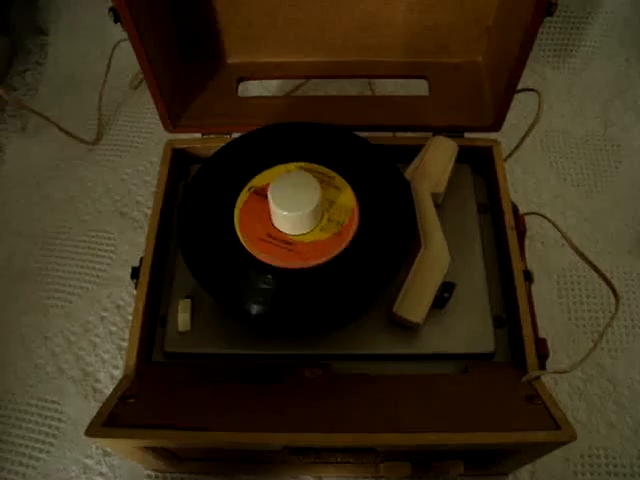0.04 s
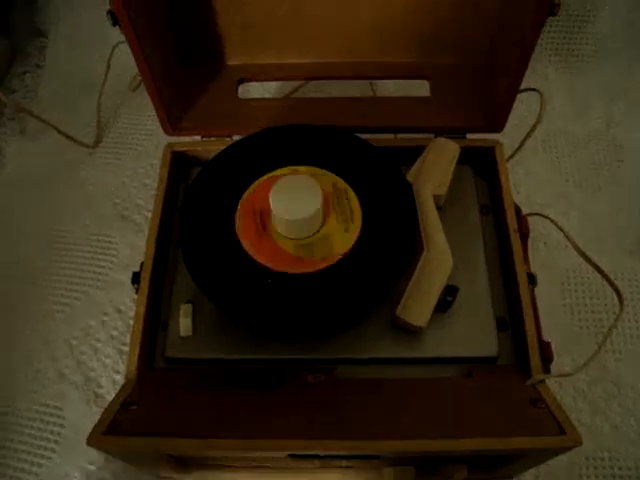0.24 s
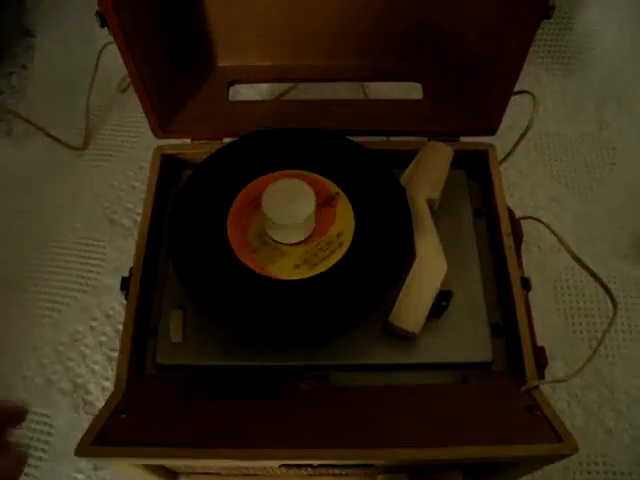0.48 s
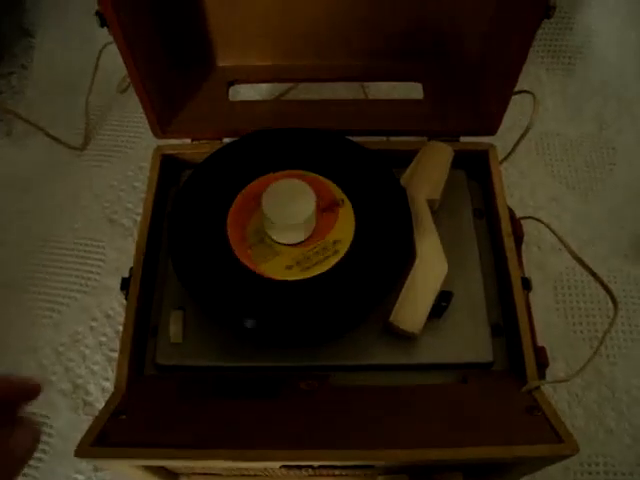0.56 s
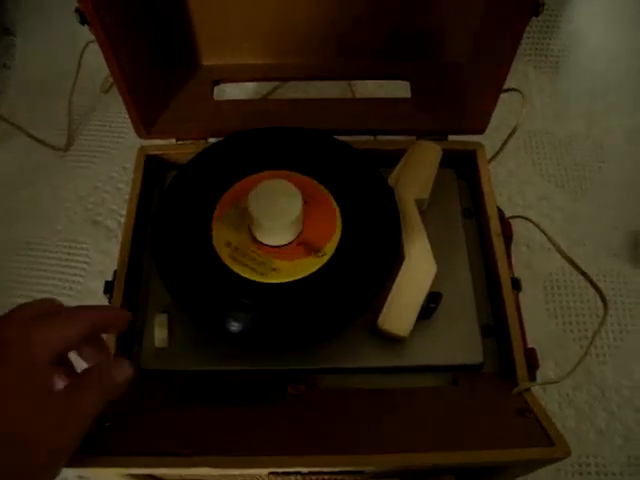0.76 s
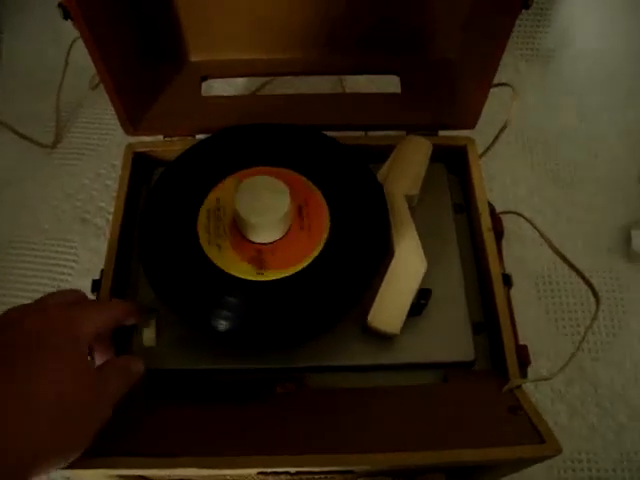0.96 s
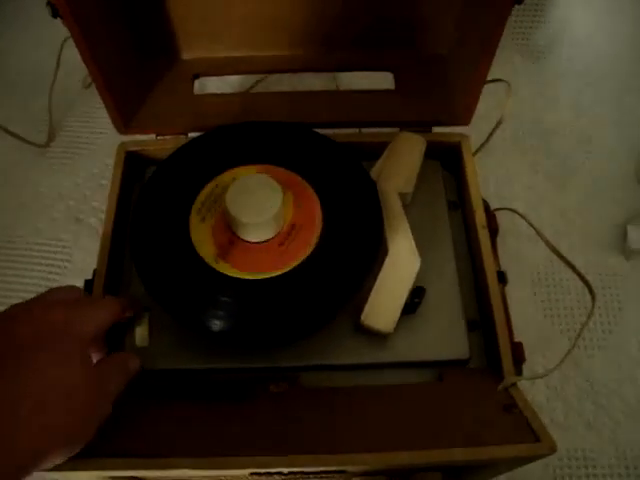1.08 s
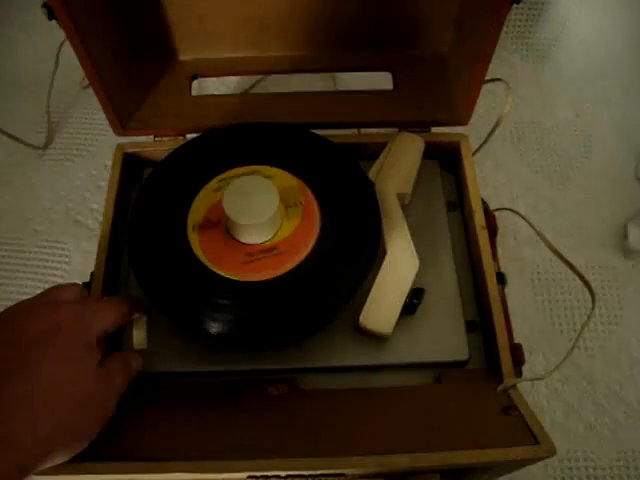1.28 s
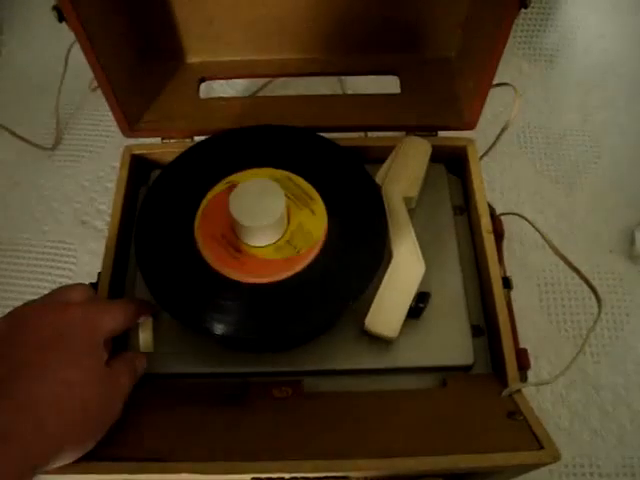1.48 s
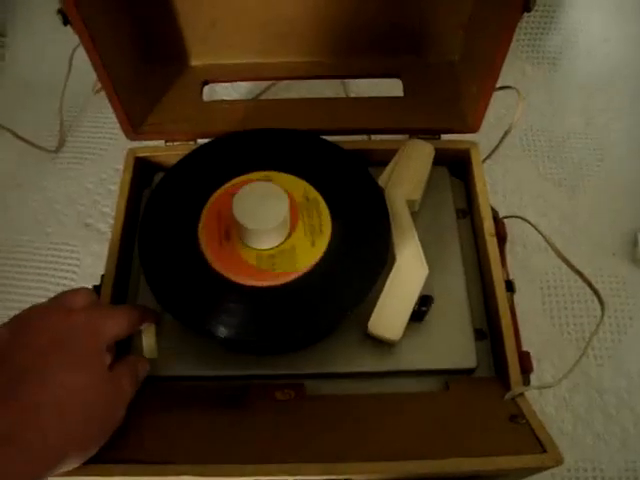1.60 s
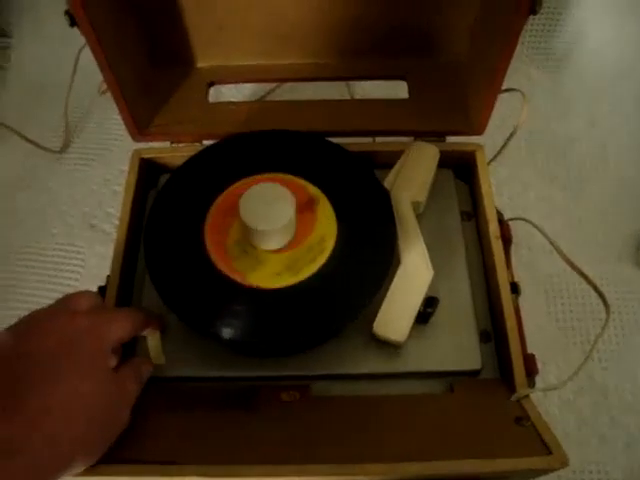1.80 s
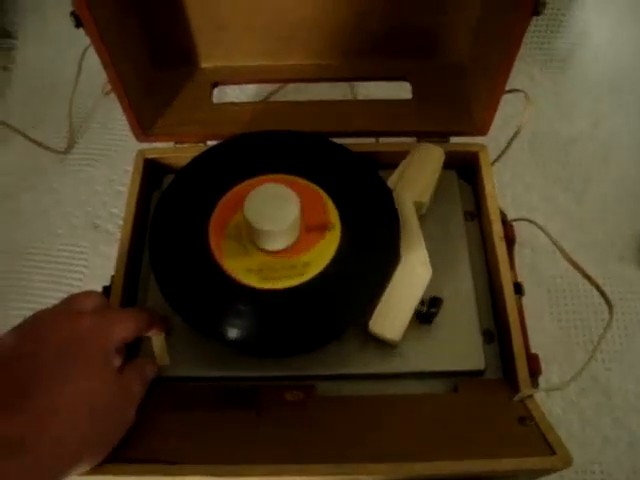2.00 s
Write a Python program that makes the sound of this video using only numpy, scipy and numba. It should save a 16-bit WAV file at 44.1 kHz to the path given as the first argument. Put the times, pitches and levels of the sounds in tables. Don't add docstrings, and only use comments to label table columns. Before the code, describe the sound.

A portable turntable runs with a low wavering motor hum and soft wooden thumps about eleven times a second. Near silence until 0.14 s, then a snappy plastic button click. Fingers rub and click the camera shell at 0.42-0.55 s, with slight clicks near 0.74, 1.21 and 1.92 s. Short dry rattles recur from 0.7 s, over thin room hiss and faint high whistle, until the end.

```python
import sys
import numpy as np
from scipy import signal
from scipy.io import wavfile
from scipy.ndimage import uniform_filter1d
from numba import njit

SR = 44100
rng = np.random.default_rng(int(sys.argv[2]) if len(sys.argv) > 2 else 0)


def int16_out(signal):
    q = np.round(np.clip(np.atleast_2d(signal).T, -1, 1) * 32767)
    wavfile.write(sys.argv[1], SR, q.astype(np.int16))


def decibels_to_gain(level_db):
    exponent = np.asarray(level_db, float) / 20
    return 10 ** exponent


N = 90228
T = np.arange(N) / SR
START_S = 0.136
HIT_T = np.arange(3000) / SR


@njit
def svf(x, hz, width):
    y, band, low = np.empty(len(x)), 0., 0.
    g, k = np.tan(np.pi * hz / SR), width / hz
    for i in range(len(x)):
        v = (band + g * (x[i] - low)) / (1 + g * (g + k))
        band, low, y[i] = 2 * v - band, low + 2 * g * v, k * v
    return y


def unit(x):
    return x / np.sqrt(np.mean(x ** 2))


def walk(rate):
    k = int(SR / rate)
    held = np.repeat(rng.standard_normal(N // k + 1), k)
    return 1.25 * uniform_filter1d(uniform_filter1d(held, k), k)[:N]


def body(x, table, steep=False):
    out = 0
    for k, (hz, width, db) in enumerate(table):
        y = svf(x, 1. * hz, 2. * width) if steep else x
        out = out + (-1) ** k * decibels_to_gain(db) * svf(y, 1. * hz, 1. * width)
    return out


def ring(modes, t, chance):
    scatter_db, rise_s = 1.5, 0.0006
    y = 0
    for (hz, db, t60), c in zip(modes, chance):
        decay = np.exp(-np.log(1000) * t / t60)
        y = y + decibels_to_gain(db + scatter_db * c) * np.sin(2 * np.pi * hz * (1 + 0.006 * c) * t + 2 * c) * decay
    y = y * np.clip(t / rise_s, 0, 1)
    return y / np.abs(y).max()


def crack(hiss):
    return svf(svf(hiss, 5000., 3700.), 5000., 5500.) * np.exp(-HIT_T / 0.00082)


def tones(table, waver_db, rate, blur_hz=0):
    out = 0
    for hz, db in table:
        level = np.sqrt(2) * decibels_to_gain(db + waver_db * walk(rate))
        cycles = np.cumsum(hz + blur_hz * walk(rate)) / SR + rng.random()
        out = out + level * np.sin(2 * np.pi * cycles)
    return out


# t/s, peak level/dB
BUTTON = [
    (0.138, -40),
    (0.1394, -28),
    (0.1419, -14),
    (.1435, -17),
]
# f/Hz, level/dB, time to fall 60 dB t/s
BUTTON_MODES = [(342, -20, .02), (872, -12, 0.033), (1050, -6, 0.017), (1335, -17, 0.031),
                (1613, -7, 0.024), (2330, 0, 0.01), (3570, -2, 0.0069), (4400, 0, .008), (5560, -16, .006),
                (6540, -2, 0.0053), (7450, -3.5, 0.0045), (8166, -11, 0.0073)]


def start_button(chances, hisses):
    out = np.zeros(N + 4000)
    for (s, db), chance, hiss in zip(BUTTON, chances, hisses):
        i = int(s * SR)
        out[i:i + len(HIT_T)] += decibels_to_gain(db) * (ring(BUTTON_MODES, HIT_T, chance) + decibels_to_gain(-3) * crack(hiss))
    i = int(START_S * SR)
    thud = np.sin(2 * np.pi * 45.5 * HIT_T) * np.exp(-HIT_T / 0.011)
    out[i:i + len(HIT_T)] += decibels_to_gain(-29.5) * thud
    return out[:N]


# f/Hz, rms level/dB
HUM = [(658, -66), (363.8, -62), (478, -70), (539, -61.5), (839, -61.5), (1149, -59.5)]
# t/s, f/Hz, rms level/dB
MAINS = [
    (0.2, 120.4, -60),
    (0.23, 120.6, -55.5),
    (1.076, 120.7, -56),
    (1.388, 122.2, -53),
    (1.43, 119.3, -62.5),
    (1.532, 119.2, -51.5),
    (1.726, 119, -60),
    (1.768, 117.8, -62.5),
    (1.874, 121.2, -49),
    (2.04, 118.8, -57.5),
]
# t/s, level/dB
STRAIN = [(0.2, -47.5), (0.302, -74), (0.374, -47), (0.6, -58), (0.75, -57), (0.9, -54.5), (1.188, -48.5),
          (1.254, -61), (1.394, -47), (1.496, -65), (1.614, -42), (1.952, -53.5), (2.04, -41.5)]


def motor():
    s, hz, db = np.array(MAINS).T
    cycles = np.cumsum(np.interp(T, s, hz)) / SR
    mains = np.sqrt(2) * decibels_to_gain(np.interp(T, s, db)) * np.sin(2 * np.pi * cycles)
    hum = tones(HUM, 3, 8.5)
    strain = tones([(241.6, -0.5)], 1.4, 8.3) * decibels_to_gain(np.interp(T, *np.array(STRAIN).T))
    return mains + hum + strain


# t/s, case boom level/dB
THUMPS = [(.258, -38), (.357, -42), (.435, -37.5), (0.533, -38), (.621, -39.5), (0.716, -41.5), (.797, -41),
          (.881, -48.5), (0.977, -38), (1.083, -46), (1.152, -44), (1.262, -39.5), (1.343, -44.5),
          (1.429, -44.5), (1.521, -37.5), (1.63, -37.5), (1.709, -37.5), (1.8, -43.5), (1.882, -37),
          (1.987, -42)]
# t/s, rms level/dB, half length t/s
RUMBLES = [(.17, -52, .012), (0.257, -42.5, 0.012), (0.338, -54.5, 0.016), (0.451, -45, 0.019),
           (0.548, -50, 0.015), (0.625, -45, 0.013), (0.663, -47, .008), (0.724, -51.5, 0.023),
           (0.808, -49, .016), (0.895, -46.5, 0.026), (0.984, -47, 0.018), (1.085, -41, 0.011),
           (1.156, -42, .015), (1.265, -41.5, 0.023), (1.348, -52.5, 0.017), (1.449, -53.5, .018),
           (1.528, -43.5, 0.0093), (1.585, -45.5, .014), (1.628, -44, .008), (1.699, -40.5, 0.0097),
           (1.726, -44.5, 0.017), (1.806, -39, 0.018), (1.893, -41, 0.013), (1.933, -50, .012),
           (1.974, -43.5, 0.019), (2.005, -46.5, 0.018)]
# f/Hz, width f/Hz, level/dB
CASE = [(190, 155, -7.5), (237.6, 17.8, 0.5), (307.6, 27.6, 0), (393, 23, 2.5), (476, 41.7, 0),
        (543, 103, -6.5), (627.2, 43, 0), (824, 122, -7), (1046, 150, -9), (1139, 23, -7),
        (1366, 280, -14.5), (2520, 380, -16), (3170, 380, -14)]


def idler():
    boom_hz, lag_s, width_s, boom_trim_db = 183.7, 0.017, 0.025, -1.5
    boom, t = np.zeros(N + 9000), np.arange(-4000, 4000) / SR
    swell_shape = np.exp(-((t - lag_s) / width_s) ** 2)
    for (s, db), turn in zip(THUMPS, rng.random(30)):
        at = slice(int(s * SR) - 4000, int(s * SR) + 4000)
        boom[at] += decibels_to_gain(db + boom_trim_db) * swell_shape * np.sin(2 * np.pi * (boom_hz * t + turn))
    swell = decibels_to_gain(-47)
    for s, db, half in RUMBLES:
        swell = swell + decibels_to_gain(db) * np.exp(-((T - s) / half) ** 2)
    grit = rng.standard_normal(N) * decibels_to_gain(2 * walk(90))
    rumble = unit(body(grit, CASE[:-2], steep=True)) * swell
    bearing = unit(body(grit, CASE[-2:], steep=True)) * decibels_to_gain(-60 + 2.5 * walk(20.28))
    return boom[:N] + rumble + bearing


# f/Hz, level/dB per Hz
FLOOR = [(28, -1.5), (60, -8.5), (95, -17), (200, -6.5), (1130, -13), (1300, -16.5), (4000, -24),
         (8180, -26.5)]


def room_floor():
    floor_hz, floor_db = np.array(FLOOR).T
    out = 0
    for hz in 28 * 2 ** (np.arange(26) / 3):
        db = np.interp(np.log(hz), np.log(floor_hz), floor_db)
        db = db - 6.5 * (hz > 8800) + 1.5 * walk(12.29)
        out = out + decibels_to_gain(db) * svf(svf(rng.standard_normal(N), hz, hz / 3), hz, hz / 3)
    return unit(out) * decibels_to_gain(-47.5)


# f/Hz, rms level/dB
WHISTLE = [
    (8122, -66),
    (11000, -20.5),
]


def whistle():
    low = tones(WHISTLE[:1], 1.0, 38.24, blur_hz=5.4)
    high = tones(WHISTLE[1:], 1.8, 11)
    switched_on = (walk(14) > -.1) * (T < T[-600])
    return low + high * uniform_filter1d(1. * switched_on, 300)


# t/s, rms level/dB
SLIDE = [
    (.14, -75),
    (.2, -61),
    (.3, -63),
    (.36, -57.5),
    (.43, -59.5),
    (.48, -65),
    (.6, -75),
]


def sliding_fingers():
    s, db = np.array(SLIDE).T
    skin = unit(svf(rng.standard_normal(N), 4500., 6000.))
    return skin * decibels_to_gain(2.5 * walk(56.7) + np.interp(T, s, db)) * (T > s[0]) * (T < s[-1])


# t/s, peak level/dB, length t/s, brightness level/dB
RATTLES = [(0.161, -28.5, 0.018, -1), (0.713, -32, 0.0062, 1), (0.814, -39.5, 0.021, -3),
           (0.892, -33, 0.0072, -0.5), (0.967, -38, 0.019, 0), (1.0705, -28.5, .013, 2),
           (1.146, -29.5, 0.019, -1.5), (1.2508, -35, 0.016, 2.5), (1.329, -37.5, 0.0087, -2),
           (1.3570, -41, .012, 0), (1.4345, -33.5, 0.014, 3.5), (1.538, -39, 0.011, -4),
           (1.617, -31, 0.013, 2), (1.6915, -36.5, 0.0087, -5), (1.794, -27.5, 0.0074, 6),
           (1.8027, -27, 0.018, 1.5), (1.875, -32, 0.0077, -2), (1.951, -31.5, 0.016, 5),
           (1.973, -36, 0.015, -0.5)]
# f/Hz, width f/Hz, level/dB
PART = [(1500, 300, -16), (2018, 152, 0), (2536, 197, 1), (3065, 370, 0), (3820, 175, -4.5),
        (4550, 630, -7), (6200, 870, -7.5), (7320, 830, -5.5), (8660, 1030, -15)]


def rattle():
    trim_db, tail_s, grain_db, bright_fade_s, impact_db = -12.5, 0.005, 3.5, 0.017, 21.5
    grit = rng.standard_normal(N + 4000) * decibels_to_gain(grain_db * np.resize(walk(700), N + 4000))
    grit[(np.array(RATTLES)[:, 0] * SR).astype(int) + 20] = decibels_to_gain(impact_db)
    dull, bright = body(grit, PART[:5], steep=True), body(grit, PART[5:])
    scale = np.std(dull + bright)
    out, t = np.zeros(N + 4000), np.arange(4000) / SR
    for s, db, length, bright_db in RATTLES:
        at = slice(int(s * SR), int(s * SR) + len(t))
        env = np.clip(t / 0.0002, 0, 1) * np.exp(-np.clip(t - length, 0, 1) / tail_s)
        chatter = dull[at] + decibels_to_gain(bright_db) * np.exp(-t / bright_fade_s) * bright[at]
        out[at] += decibels_to_gain(db + trim_db) * env * chatter / scale
    return out[:N]


# t/s, peak level/dB, f/Hz, half length t/s
PINGS = [
    (.161, -38, 5750, .0015),
    (.1655, -38, 5750, .0015),
    (.5505, -39, 5800, .0015),
    (.4405, -30, 1420, .003),
    (.4465, -26, 1390, .004),
    (1.2115, -34, 1300, .003),
]


def pings():
    out = np.zeros(N)
    for s, db, hz, half in PINGS:
        out += decibels_to_gain(db) * np.exp(-((T - s - half) / half) ** 2) * np.sin(2 * np.pi * hz * T)
    return out


# t/s, peak level/dB, sharpness level/dB, pitch factor, low body level/dB
CLICKS = [(0.423, -41, 9, 1.0, 0), (0.425, -34, 13, 1.07, -7), (.4330, -33, -30, 0.87, 0),
          (.4348, -35, -25, 0.95, -3), (0.4397, -22, -0.5, 1.0, -9), (0.4415, -25.5, 0, 1.12, -2),
          (0.4465, -34, -22, 1.05, -8), (0.4489, -28, -7, 1.075, -8), (0.5068, -29.5, -11, 0.96, -2),
          (.5115, -30, -25, .9, -9), (.5280, -26.5, -19, 0.85, 3), (0.5304, -35, -25, 1.1, 4),
          (.5362, -27.5, -24, 1.0, 4), (.5430, -23.5, -3.5, 0.98, 8), (0.5434, -15, -11, 1.008, -4),
          (0.546, -28.5, -8, 0.967, -3), (.5503, -24, -22, 1.1, -10), (.7380, -33, -23, 0.94, -7),
          (1.2113, -28, -25, 0.965, 1), (1.2132, -32.5, -26, 1.055, -1), (1.920, -32.5, -23, 0.68, -8),
          (1.926, -28.5, -30, 0.62, -4)]
# f/Hz, level/dB, time to fall 60 dB t/s
KNOCK = [(395, -11, 0.028), (676, -9.5, .05), (990, -2, 0.013), (1250, -1.5, 0.02), (1420, -6.5, 0.032),
         (1670, 0.5, 0.012)]
# f/Hz, level/dB, time to fall 60 dB t/s
TICK = [(2350, 0, 0.0096), (3440, 1, .008), (4350, -2.5, .008), (5800, -20, 0.0061), (7000, -6, .006),
        (7640, -5, 0.0095), (8730, -3.5, 0.0057)]


def shell_clicks(chances, hisses):
    out = np.zeros(N + 4000)
    for (s, db, sharp_db, pitch, body_db), chance, hiss in zip(CLICKS, chances, hisses):
        i = int(s * SR)
        modes = [(hz, mode_db + body_db * (hz < 1100), t60) for hz, mode_db, t60 in KNOCK]
        knock = ring(modes, HIT_T * pitch, chance)
        tick = ring(TICK, HIT_T * pitch, chance[8:]) + decibels_to_gain(3.5) * crack(hiss)
        out[i:i + len(HIT_T)] += decibels_to_gain(db) * (knock + decibels_to_gain(sharp_db) * tick)
    return out[:N]


def scene():
    steady = motor() + idler() + rattle() + room_floor() + whistle()
    fade_in = np.clip((T - START_S) / 0.019, 0, 1)
    chances, hisses = rng.standard_normal((30, 16)), rng.standard_normal((30, 3000))
    plastic = start_button(chances[::-1], hisses[::-1]) + pings() + shell_clicks(chances, hisses)
    plastic = signal.sosfilt(signal.butter(4, 8530, fs=SR, output="sos"), plastic)
    return (steady * fade_in + plastic + sliding_fingers())[None]


# t/s, length t/s, low edge f/Hz, high edge f/Hz
HOLES = [(0.149, 0.025, 3900, 5300), (0.149, 0.025, 6200, 8200), (0.148, 0.014, 3720, 9800),
         (0.151, 0.011, 2500, 4000), (0.378, 0.022, 5170, 7800), (0.424, 0.013, 3440, 9100),
         (0.445, 0.019, 4130, 9300), (0.507, 0.027, 6200, 7150), (0.538, .007, 5000, 10300),
         (0.5482, 0.022, 3100, 10700), (0.683, 0.024, 5860, 7900), (0.733, 0.014, 6200, 7700),
         (0.863, 0.022, 5800, 7560), (1.036, 0.016, 4600, 7800), (1.05, 0.022, 6300, 7800),
         (1.053, 0.0083, 4220, 5300), (1.095, 0.011, 5000, 7750), (1.169, 0.011, 4800, 7350),
         (1.273, 0.018, 6200, 7750), (1.444, 0.027, 6100, 7500), (1.632, 0.013, 5500, 7900),
         (1.936, 0.013, 5100, 7700), (1.938, 0.0098, 3500, 4240)]


def dip_treble(x):
    for s, length, low_hz, high_hz in HOLES:
        i, k = int(s * SR), int(length * SR)
        band_pass = signal.butter(4, [low_hz, high_hz], "band", fs=SR, output="sos")
        band = signal.sosfiltfilt(band_pass, x[:, i - 400:i + k + 400])[:, 400:-400]
        x = x.copy()
        x[:, i:i + k] -= (1 - decibels_to_gain(-27.5)) * band * signal.windows.tukey(k, .3)
    return x


def band_limit(x):
    return signal.sosfilt(signal.butter(12, 11030, fs=SR, output="sos"), x)


def record(dry):
    x = signal.sosfilt(signal.butter(2, 86, "high", fs=SR, output="sos"), dry)
    x = signal.sosfiltfilt(signal.ellip(6, .3, 23, 10100, fs=SR, output="sos"), x)
    mix = dip_treble(x)
    return band_limit(mix)


dry = scene()
out = record(dry)
int16_out(out)
```